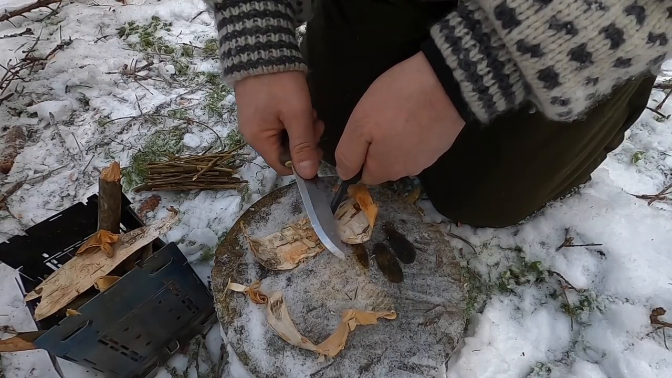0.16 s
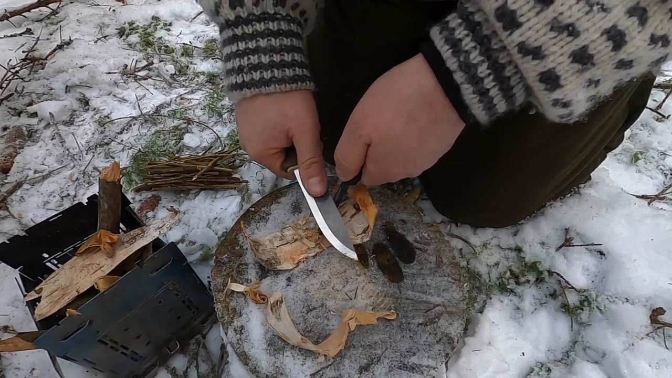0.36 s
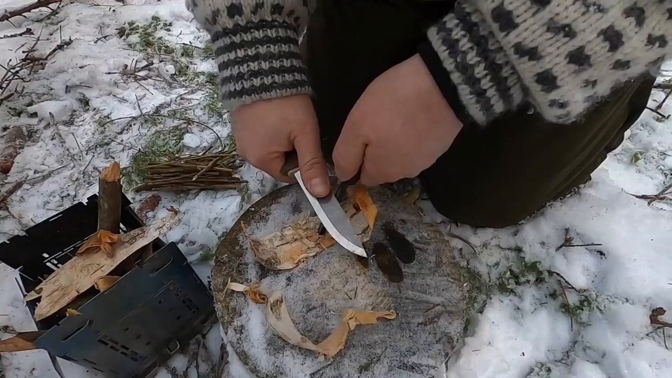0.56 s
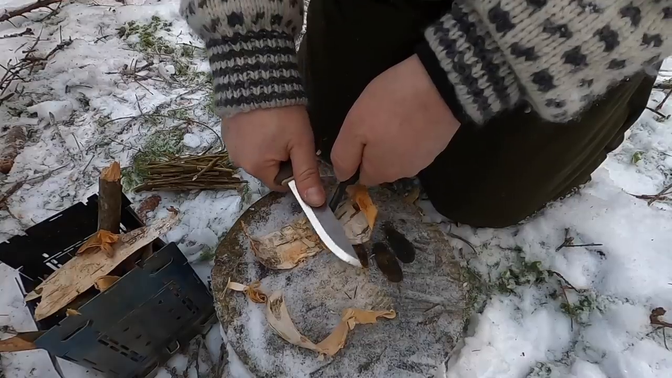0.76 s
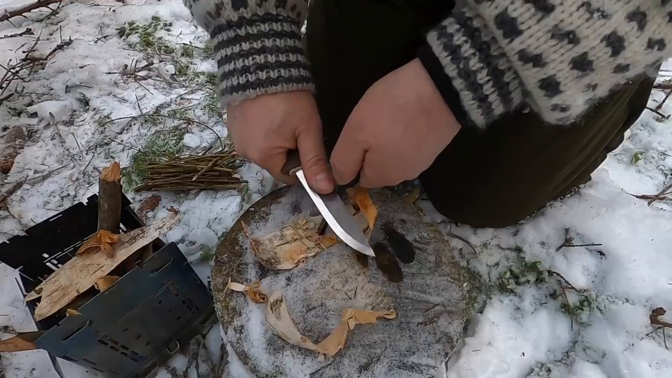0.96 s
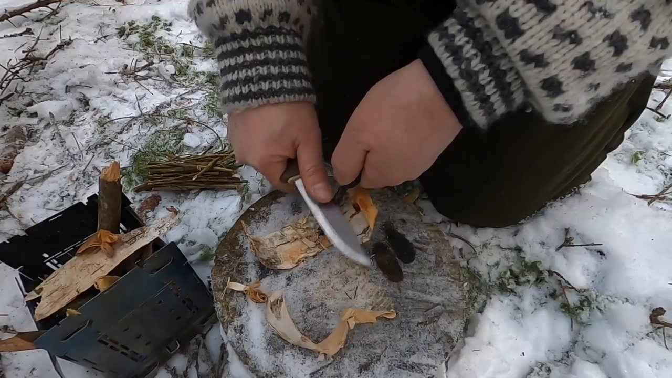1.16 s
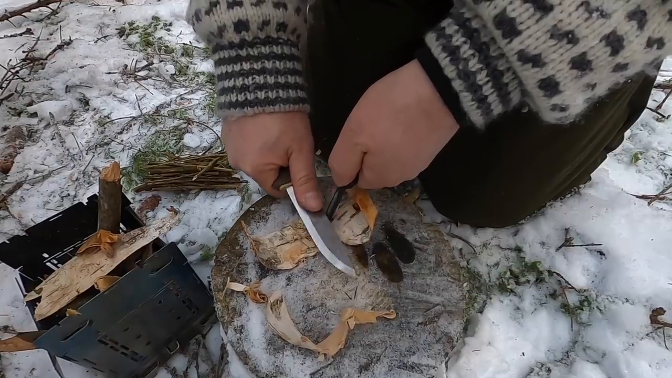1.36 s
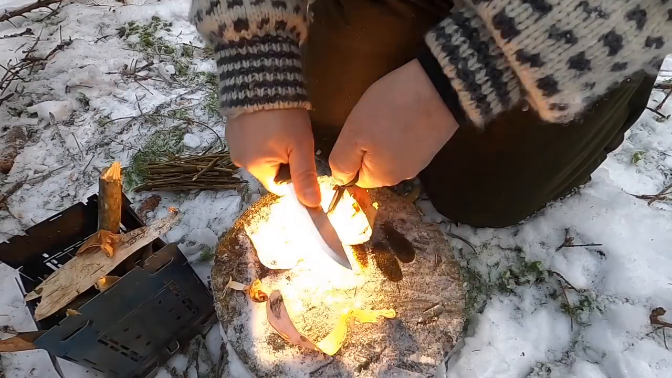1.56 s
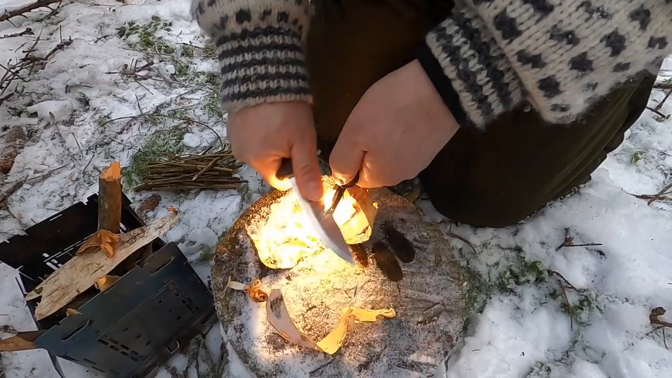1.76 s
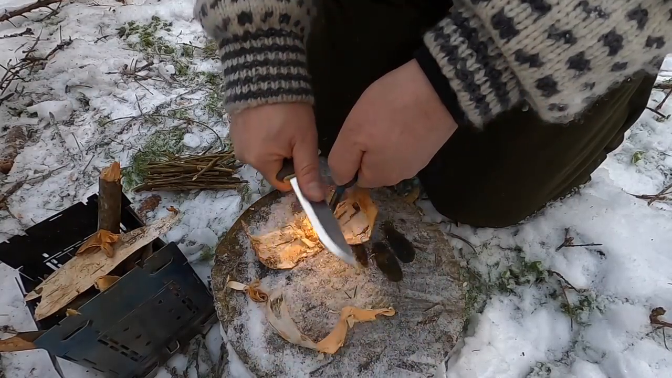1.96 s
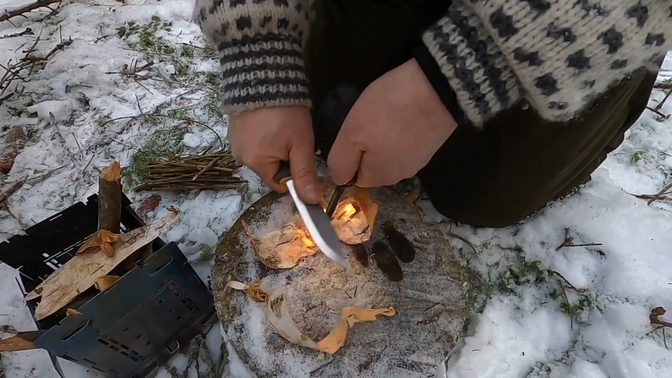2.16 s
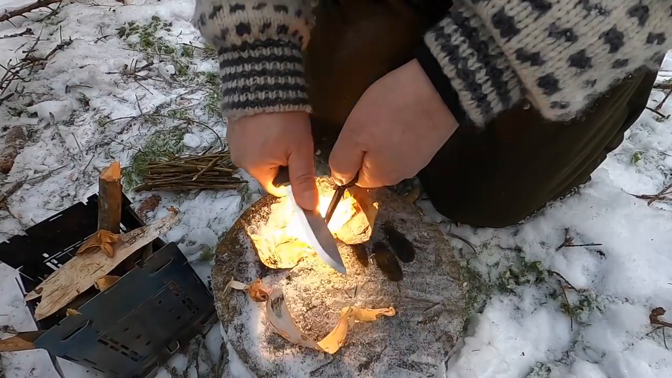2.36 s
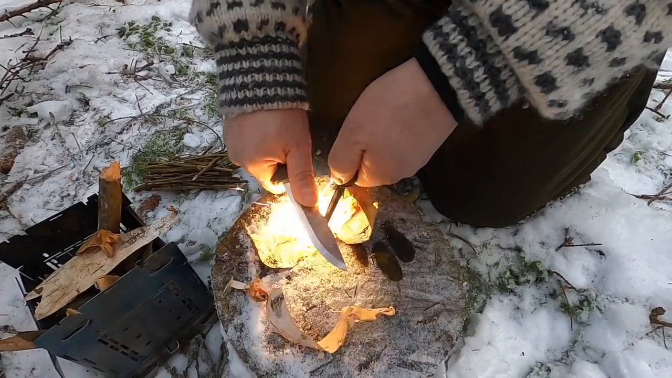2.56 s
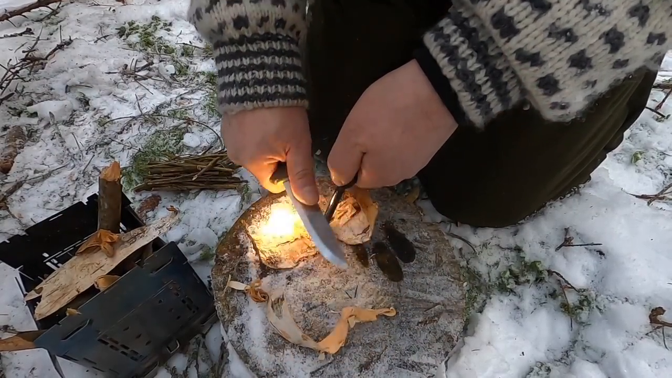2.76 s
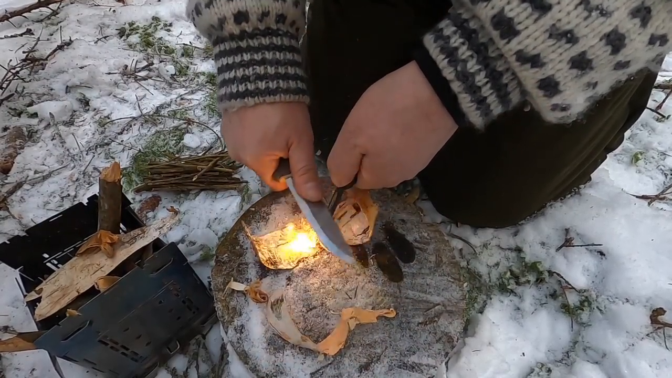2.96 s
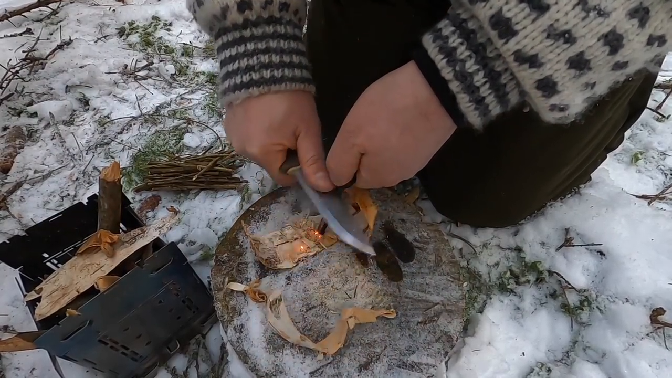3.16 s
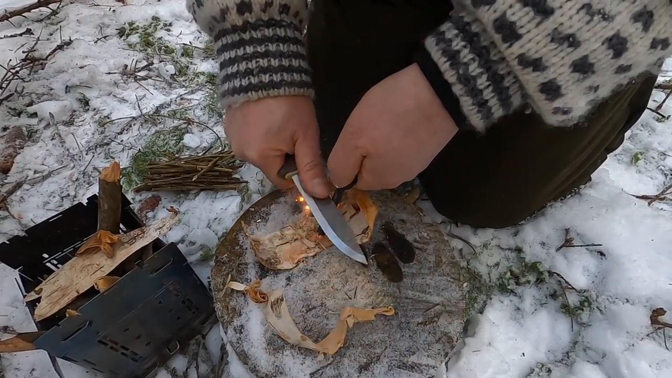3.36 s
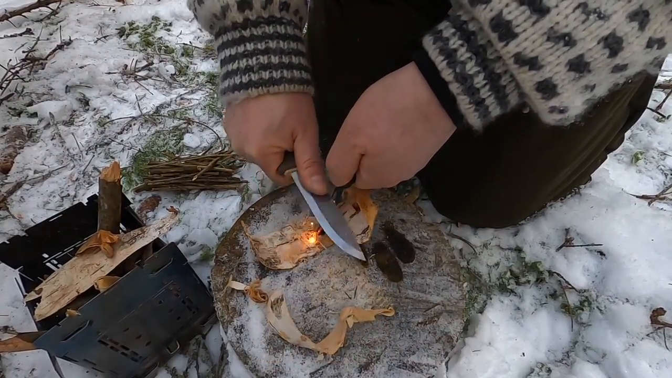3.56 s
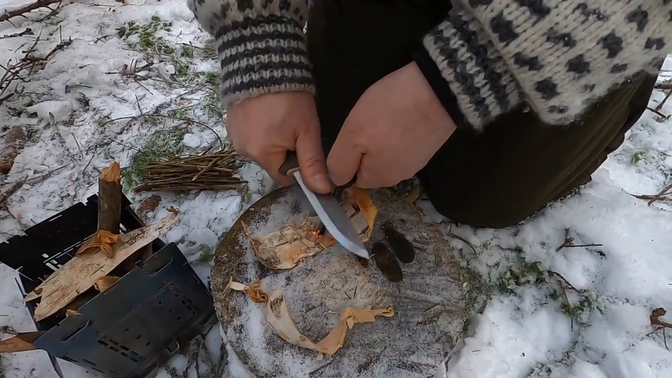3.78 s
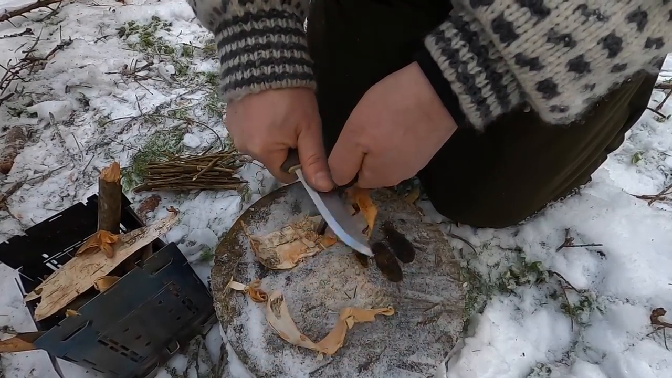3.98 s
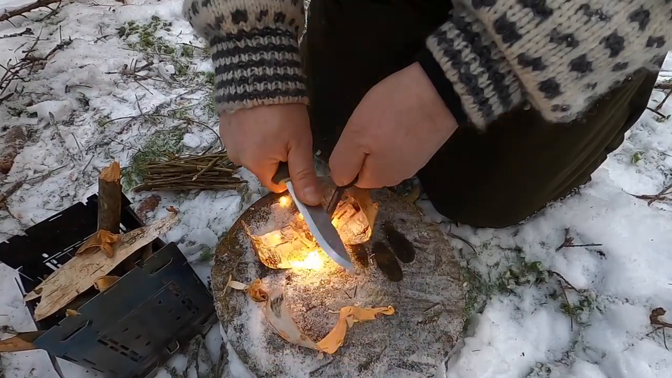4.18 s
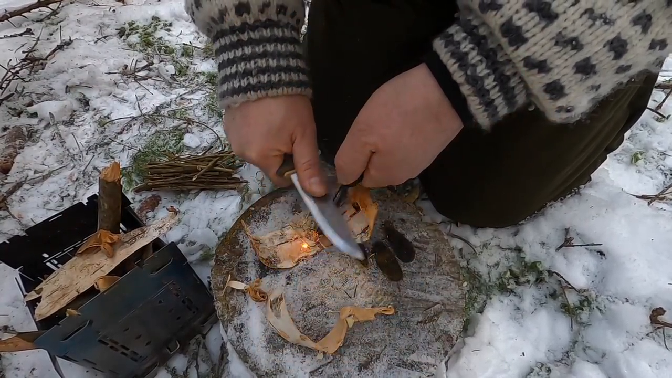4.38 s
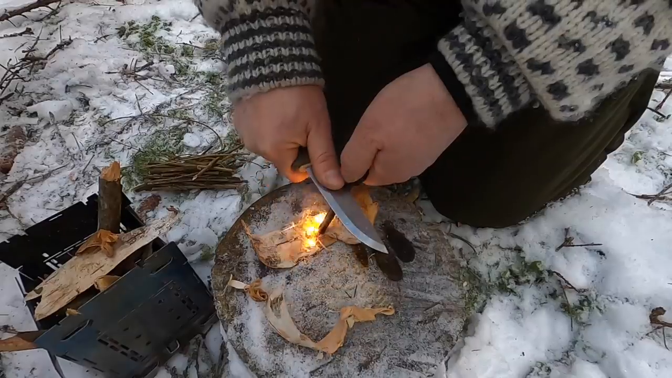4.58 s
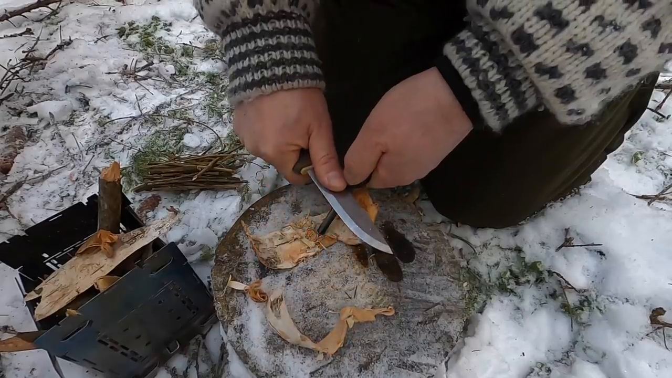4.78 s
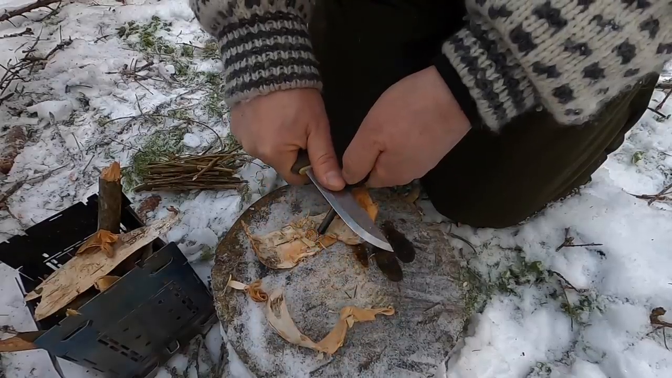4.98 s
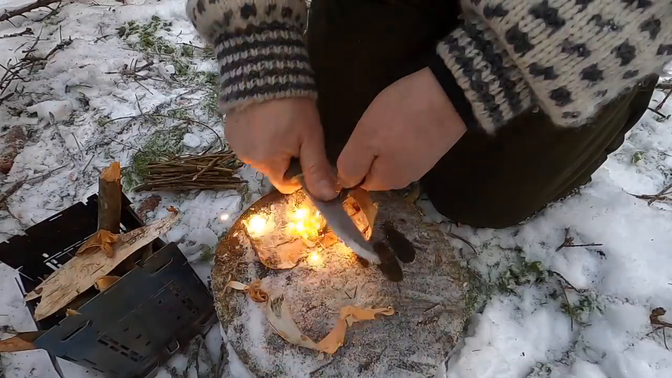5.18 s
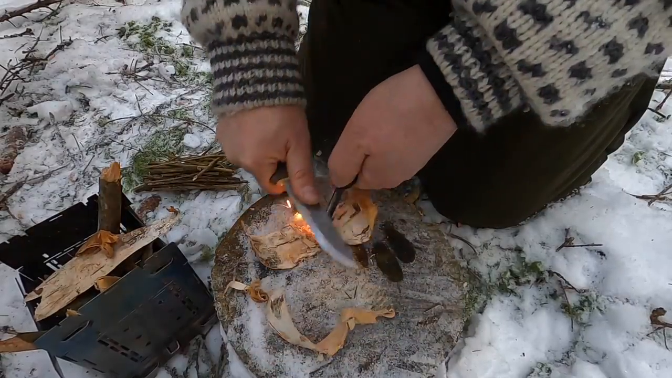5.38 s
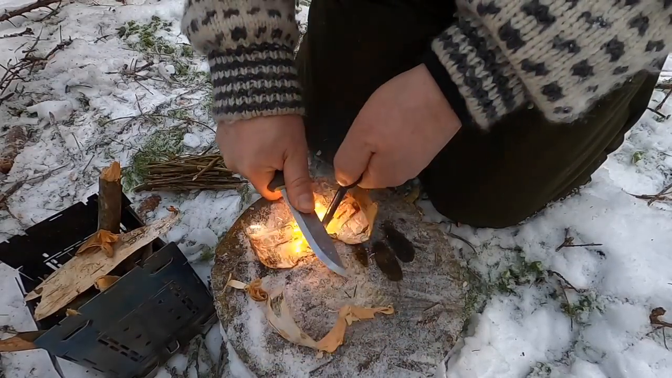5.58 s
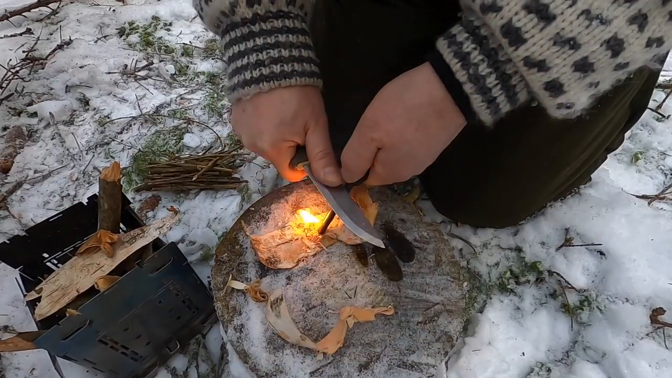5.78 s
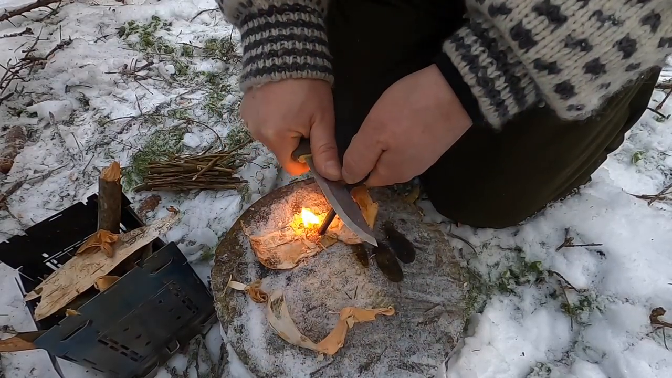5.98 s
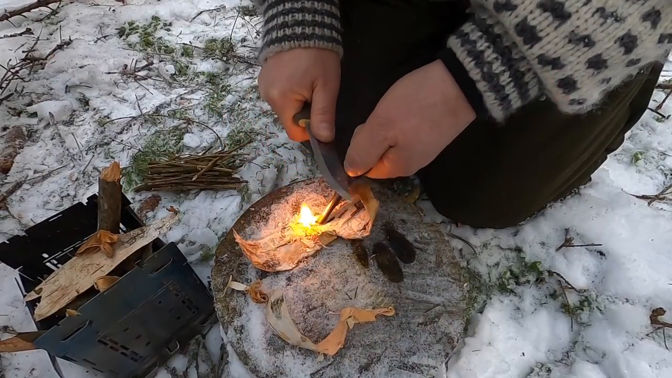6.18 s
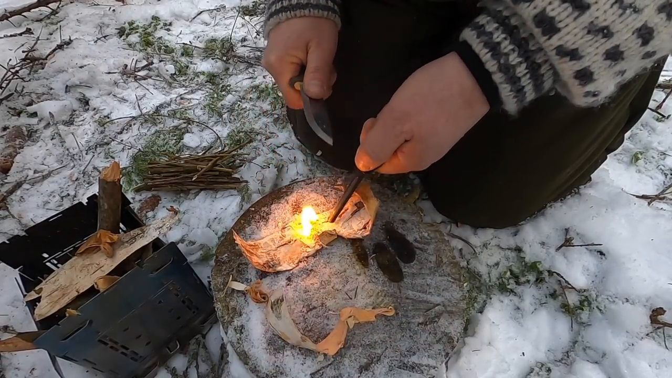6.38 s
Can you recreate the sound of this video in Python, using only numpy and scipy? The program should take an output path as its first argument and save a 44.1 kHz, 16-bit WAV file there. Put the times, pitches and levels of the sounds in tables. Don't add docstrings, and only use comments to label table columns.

```python
import sys
import numpy as np
from scipy import signal
from scipy.fft import rfft, irfft
from scipy.io import wavfile
from scipy.ndimage import uniform_filter1d, map_coordinates

SR = 44100
rng = np.random.default_rng(int(sys.argv[2]) if len(sys.argv) > 2 else 0)


def persist_wave(psi):
    counts = np.round(np.clip(psi, -1, 1) * 32767).astype(np.int16)
    wavfile.write(sys.argv[1], SR, np.atleast_2d(counts).T)


def decibels_to_gain(level_db):
    exponent = np.asarray(level_db, float) / 20
    return 10 ** exponent


N = 283694
TIME = np.arange(N) / SR

# (frequency [Hz], density [dB per Hz])
BITE = [(24, -67.5), (40, -43), (210, -17), (372, -5.5), (581, -3.5), (1110, 0), (1450, -3), (1730, 0),
        (2840, -3), (4540, -2), (5820, -11), (6750, -7.5), (8230, -29), (11400, -33), (14900, -59)]
# (frequency [Hz], width [Hz], gain [dB])
BITE_MODES = [(390, 60, -9), (1066, 190, 6), (1727, 100, -6.5), (2526, 59, 12), (4000, 330, 1.5),
              (6470, 370, 6), (9430, 930, 7.5)]


def unit(x):
    return x / np.sqrt(np.mean(x ** 2) + 1e-20)


def along(points, hz):
    f, v = np.transpose(points)
    return np.interp(np.log(hz + 1), np.log(f + 1), v)


def wobble(rate):
    return map_coordinates(rng.standard_normal(int(N * rate / SR) + 4), [TIME * rate])


def filtered(x, db_of_hz, size=4096):
    gain = decibels_to_gain(db_of_hz(np.fft.rfftfreq(size, 1 / SR)))
    ceps = irfft(np.log(np.maximum(gain, 1e-6)), size)
    ceps[1:size // 2] *= 2
    ceps[size // 2 + 1:] = 0
    return signal.oaconvolve(x, irfft(np.exp(rfft(ceps)), size))[:N]


def body(spectrum, modes, shift=1, lo_hz=1, hi_hz=1e5):
    def gain(hz):
        bumps = sum(db / (1 + (2 * (hz - c * shift) / w) ** 2) for c, w, db in modes)
        band = (1 + (lo_hz / (hz + 1)) ** 12) * (1 + (hz / hi_hz) ** 12)
        return along(spectrum, hz) + bumps - 10 * np.log10(band)
    return gain


def patchy(x, depth_db, size=128):
    z = signal.stft(x, nperseg=size)[2]
    field = uniform_filter1d(rng.standard_normal(z.shape), 3, 0)
    field = uniform_filter1d(field, 5, 1)
    return unit(signal.istft(z * decibels_to_gain(depth_db * unit(field)), nperseg=size)[1][:N])


def steady(x, span=0.024):
    return x / np.sqrt(np.abs(uniform_filter1d(x ** 2, int(span * SR))) + 1e-9)


def grit(per_s, spread_db, clump_db, smooth):
    hit = rng.random(N) < per_s / SR
    size = decibels_to_gain(spread_db * np.minimum(rng.exponential(size=N), 4)) * rng.choice([-1, 1], N)
    slips = unit(hit * size) + smooth * rng.standard_normal(N)
    return unit(slips * decibels_to_gain(clump_db * (wobble(70) + wobble(220))))


def sliding(x, spectrum, modes, travel, **band):
    turn = np.pi / 4 * (1 + np.tanh(wobble(29)))
    low = filtered(x * np.cos(turn), body(spectrum, modes, 1 - travel, **band))
    high = filtered(x * np.sin(turn), body(spectrum, modes, 1 + travel, **band))
    return unit(low + high)


def pings(hz, per_s, scatter, cycles, spread_db):
    at = np.flatnonzero((rng.random(N) < per_s / SR) & (hz > 0))
    draw = rng.standard_normal((len(at), 2))
    pitch = hz[at] * np.exp(scatter * draw[:, 0])
    step = np.arange(500)
    turns = pitch[:, None] * step / SR
    swell = (1 - np.exp(-turns)) * np.exp(-turns / cycles)
    rings = decibels_to_gain(spread_db * draw[:, 1:]) * np.sin(2 * np.pi * turns) * swell
    rings = rings * np.cos(np.pi / 2 * step / len(step))
    out = np.bincount((at[:, None] + step).ravel(), rings.ravel(), N + len(step))[:N]
    return out / np.sqrt(np.mean(out[hz > 0] ** 2))


def knocks(rows, crack, colour):
    out, t = np.zeros(N + SR), np.arange(SR // 25) / SR
    partials = [(.68, 0.26), (.84, 0.46), (1, 1), (1.12, 0.18), (2.3, 0.36)]
    for s, db, hz, t60 in rows:
        ring = sum(g * np.sin(2 * np.pi * hz * k * t) for k, g in partials)
        burst = (ring + crack * rng.standard_normal(len(t))) * (1 - np.exp(-t / 0.00023))
        out[round(s * SR):][:len(t)] += decibels_to_gain(db - 60 * t / t60) * burst
    return filtered(out[:N], lambda hz: along(colour, hz))


def strokes(tables, land=.012, lift=0.01048, fade_db=26):
    gain, rest = np.zeros(N), np.zeros((len(tables[0][0]) - 1, N))
    for rows in tables:
        s, db, *cols = np.transpose(rows)
        a = max(int((s[0] - land) * SR), 0)
        b = min(int((s[-1] + lift) * SR), N)
        t = TIME[a:b]
        off = np.clip(np.maximum((s[0] - t) / land, (t - s[-1]) / lift), 0, 1)
        level = decibels_to_gain(np.interp(t, s, db) - fade_db * off)
        louder = np.flatnonzero(level > gain[a:b])
        gain[a + louder] = level[louder]
        progress = (s - s[0]) / (s[-1] - s[0])
        for row, c in enumerate([progress, *cols]):
            rest[row, a + louder] = np.interp(t[louder], s, c)
    return gain, rest


def pressure(p, peak_db, peak_at, rise_db, fall_db, power):
    at = np.clip(peak_at, .05, .95)
    rise = rise_db * np.clip(1 - p / at, 0, 1) ** power
    fall = fall_db * np.clip((p - at) / (1 - at), 0, 1) ** power
    return peak_db - rise - fall


def far_hush():
    # (time [s], level [dB])
    swell = [(0, -51), (.7, -54), (1.2, -50.5), (4.6, -52), (5.1, -58), (5.5, -42.5), (6, -58.5),
             (6.43, -53.5)]
    # (frequency [Hz], density [dB per Hz])
    colour = [(20, -21), (60, -15), (250, -1.5), (450, -6), (1700, -0.5), (4000, -13.5), (8000, -29),
              (12000, -36.5), (14000, -42)]
    s, db = np.transpose(swell)
    far = patchy(filtered(rng.standard_normal(N), body(colour, [])), 2.4, size=512)
    return decibels_to_gain(np.interp(TIME, s, db) + 0.25 * wobble(14)) * far


def air_moan():
    # (time [s], level [dB], pitch [Hz])
    breath = [(.13, -85.5, 310), (.2, -62, 301), (.33, -49, 323), (.44, -49, 333.5), (.58, -58, 356),
              (.72, -68, 323)]
    gain, (_, hz) = strokes([breath])
    phase = 2 * np.pi * np.cumsum(hz * (1 + 0.0484 * wobble(18))) / SR
    return gain * unit(wobble(115)) * np.sqrt(2) * np.sin(phase)


def curling_bark():
    # (time [s], peak level [dB])
    rustles = [(6.127, -56), (6.192, -44), (6.323, -48.5), (6.42, -55)]
    rise_s, fall_s, drop_db = 0.033, 0.034, 11.5
    swells = [[(s - rise_s, db - drop_db), (s, db), (s + fall_s, db - drop_db)] for s, db in rustles]
    gain, _ = strokes(swells)
    crinkle = grit(per_s=2500, spread_db=1.5, clump_db=1.5, smooth=1.3)
    colour = [(500, -16.0), (3600, -4), (9000, -28), (14000, -68.5)]  # (Hz, dB per Hz)
    return gain * patchy(filtered(crinkle, body(colour, [(3860, 900, 7.6)])), 2.5)


def trunks(x, t60=0.2):
    t = np.arange(SR // 2) / SR
    tail = rng.standard_normal(len(t)) * decibels_to_gain(-60 * t / t60)
    wet = signal.oaconvolve(x, tail / np.linalg.norm(tail))[:N]
    return filtered(wet, lambda hz: along([(300, -1), (2500, -37.0), (9000, -23.5)], hz))


def shudder():
    # (frequency [Hz], density [dB per Hz])
    handling = [(20, -11), (45, 0), (90, 0.5), (150, -28), (400, -120)]
    gain, _ = strokes(down_strokes())
    lean = uniform_filter1d(gain, int(.06 * SR))
    lumps = unit(filtered(rng.standard_normal(N), body(handling, []), size=16384))
    return (decibels_to_gain(-78.5) + decibels_to_gain(-45.5) * lean) * decibels_to_gain(5.3 * wobble(7)) * lumps


def bark_ticks():
    # (time [s], peak level [dB], decay by 60 dB [s])
    taps = [(0.0, -7, 0.0092), (0.483, -44, 0.015), (0.566, -28, 0.024), (3.517, -8.5, 0.0044),
            (4.349, -11, 0.035), (4.42, -17, 0.0092), (4.705, -7.5, 0.022), (4.772, -17.5, 0.015),
            (4.815, -35, 0.014), (5.873, -7.5, 0.028), (5.892, -27, 0.033)]
    # (frequency [Hz], gain [dB])
    colour = [(100, -28), (800, -5.5), (4500, -6.5), (7500, -24), (10000, -23), (13000, -38.5),
              (16000, -39)]
    return decibels_to_gain(-16) * knocks([(s, db, 1200, t60) for s, db, t60 in taps], crack=4.1, colour=colour)


def slide():
    # (time [s], level [dB])
    touches = [
        [(.005, -41.5), (.035, -40), (.075, -30), (.11, -40.5), (.155, -39)],
        [(.41, -45), (.45, -44), (.475, -36), (.55, -34.5)],
    ]
    # (frequency [Hz], density [dB per Hz])
    colour = [(290, -55), (500, -27), (763, -24), (1210, -10.5), (1640, 0), (2040, -5.5), (2600, 1.5),
              (4190, -22), (6400, -27), (7140, -36), (13000, -75)]
    modes = [(1700, 120, 3.5), (2500, 130, 2.6), (6400, 330, 7.3)]  # (Hz, width Hz, dB)
    gain, _ = strokes(touches)
    slips = grit(per_s=4600, spread_db=2.5, clump_db=1.5, smooth=1.1)
    return gain * patchy(sliding(slips, colour, modes, 0.015), 0.84)


def ridge_catches():
    # (time [s], peak level [dB], ring [Hz])
    snags = [(0.362, 1.5, 2810), (1.047, -9, 2330), (1.6058, -16.5, 2600), (1.9744, -2, 2575),
             (2.174, -9, 2620), (2.3065, -4, 4820), (2.35, -2, 3900), (2.3564, 0.5, 3110),
             (2.5406, -4, 3430), (2.6232, -5, 2480), (2.7267, -5, 2660), (3.254, -2.5, 2750),
             (3.286, -13.5, 2520), (3.295, -4, 1700), (3.3395, -2, 2600), (3.6362, -4, 3800),
             (3.82, -3.5, 3930), (4.0382, 1.5, 3800), (4.0623, 0, 4300), (4.0688, 4, 2500),
             (4.22, -14, 3500), (4.248, -12.5, 4260), (4.366, -6, 2550), (4.599, -9.5, 3730),
             (4.667, -6, 1800), (5.1758, -11.5, 3180), (5.1926, -1.5, 1690), (5.257, -4.5, 3770),
             (5.5383, -2, 2530), (6.1533, -24.5, 1700)]
    # (frequency [Hz], gain [dB])
    colour = [(100, -18), (800, 0), (3000, 2), (5000, 2), (7500, -16), (12000, -44), (16000, -70)]
    return decibels_to_gain(-7) * knocks([(*row, .011) for row in snags], crack=0.19, colour=colour)


def up_strokes():
    # (start [s], length [s], peak level [dB], peak position [0-1 of the stroke], first ring [Hz])
    pulls = [(1.016, 0.059, -21, 0.54, 2520), (1.27, 0.059, -19.5, 0.69, 2750),
             (1.509, 0.074, -22, 0.68, 2740), (1.763, 0.062, -16.5, 0.73, 2697),
             (1.974, 0.053, -17, 0.58, 2560), (2.162, 0.061, -18.5, 0.77, 3000),
             (2.344, 0.061, -17.5, 0.65, 4000), (2.529, 0.066, -16.5, 0.81, 4350),
             (2.716, 0.049, -17.5, 0.8, 4680), (2.896, 0.045, -20.5, 0.07, 3440),
             (3.074, .044, -21.5, 0.13, 3700), (3.239, 0.062, -14.5, 0.82, 4460),
             (3.435, .063, -24, 0.2, 3470), (3.628, 0.0616, -18.5, 0.45, 4460),
             (3.817, 0.067, -17.5, 0.79, 4430), (4.015, 0.058, -15.5, 0.74, 4500),
             (4.302, 0.1, -27, 0.7, 2950), (4.419, 0.019, -49, .3, 2600), (4.576, 0.1, -19, 0.84, 4280),
             (5.25, 0.089, -19.5, 0.71, 3260), (5.484, 0.077, -17.5, 0.75, 4000),
             (5.728, 0.093, -19.5, 0.59, 3640)]
    rest_hz, sink = 2400, 1.67
    end_sag_hz = 120
    p = np.linspace(0, 1, 25)
    snag_db_per_khz, snag_at, snag_width = 2.5, 0.15, 0.14
    snag = snag_db_per_khz * np.exp(-((p - snag_at) / snag_width) ** 2)
    tables = []
    for s, length, db, at, hz in pulls:
        above_hz = hz - rest_hz
        lean_db = pressure(p, db, at, rise_db=10.5, fall_db=9, power=1.02)
        ring_hz = rest_hz + above_hz * (1 - p) ** sink - end_sag_hz * p ** 1.9
        tables.append(np.transpose([s + length * p, lean_db + above_hz / 1000 * snag, ring_hz, db + 0 * p]))
    return tables


def pull():
    # (frequency [Hz], density [dB per Hz])
    colour = [(60, -47.5), (320, -22.5), (760, -21), (1350, -21), (1900, -12), (2600, -3), (4300, -10.5),
              (6600, -20), (7400, -23), (11000, -41), (14000, -65.5), (15500, -75)]
    # (frequency [Hz], width [Hz], gain [dB])
    modes = [(403, 400, -6.5), (1030, 340, 13.5), (1719, 172, 12.5), (3900, 260, 3.5), (6300, 190, 7.5),
             (8150, 1700, -14)]
    blade_hz, clearer_db_per_khz = 2515, 3
    dull_hz, dulling = 5000, 0.38
    gain, (_, ring_hz, peak_db) = strokes(up_strokes())
    slips = grit(per_s=3200, spread_db=4.5, clump_db=-1.44, smooth=0.6)
    skate = patchy(sliding(slips, colour, modes, 0.02), 2.4)
    treble = filtered(skate, body([(1, 0.0031)], [], lo_hz=dull_hz))
    skate = filtered(skate, body([(1, 0.0098)], [], hi_hz=dull_hz))
    skate = skate + (gain / decibels_to_gain(peak_db)) ** dulling * treble
    ring = pings(ring_hz, per_s=800, scatter=.11, cycles=5.5, spread_db=4.5)
    ring = decibels_to_gain(-0.5 + clearer_db_per_khz * (ring_hz - blade_hz) / 1000) * ring
    tuned = np.exp(-((ring_hz - blade_hz) / 250) ** 2)
    note = pings(blade_hz * (gain > 0), per_s=300, scatter=0.012, cycles=30, spread_db=4)
    judder = decibels_to_gain(2 * wobble(110))
    return gain * steady(judder * (skate + ring) + decibels_to_gain(1) * tuned * note)


def down_strokes():
    # (start [s], length [s], peak level [dB], peak position [0-1 of the stroke],
    # weight on the stump [dB])
    pushes = [(0.815, 0.0992, -28.5, 0.32, -1), (1.113, 0.1195, -26.5, 0.52, -0.5),
              (1.344, 0.13, -24.5, 0.36, -2), (1.602, 0.03, -25.5, 0.6, -8.5), (1.64, 0.12, -22, 0.23, 4),
              (1.856, 0.077, -21, 0.7, -1.5), (1.94, 0.017, -40.5, 0.2, 4), (2.059, 0.12, -22.5, 0.4, 1),
              (2.253, 0.088, -24, 0.46, 0), (2.432, 0.094, -21.5, 0.6, -2), (2.621, 0.085, -22, 0.59, 1),
              (2.799, 0.075, -23.5, 0.62, -1.5), (2.969, .084, -25.5, 0.65, -2.5),
              (3.155, 0.077, -23, 0.43, 0.5), (3.327, 0.1, -23.5, 0.45, 0), (3.526, .084, -24.5, 0.7, 0),
              (3.722, 0.072, -21.5, .65, -3), (3.916, 0.079, -20, 0.4, -3.5), (4.099, .155, -25.5, 0.26, 3),
              (4.251, 0.052, -43, .4, 7.5), (4.49, 0.1, -26, 0.47, 2), (5.145, 0.1, -23.5, 0.64, 4.5),
              (5.371, 0.09, -20, 0.66, -1.5), (5.606, 0.11, -22.5, 0.59, -0.5)]
    firm_db, rod_free, spark_free = -21.5, 0.45, 0.35
    p = np.linspace(0, 1, 25)
    stump_db = -12 + 11.5 * p
    rod_db = -18.5 + 10.5 * np.exp(-((p - .33) / 0.29) ** 2)
    spark_db = -19 - 12 * np.exp(-p / 0.22)
    tables = []
    for s, length, db, at, weight_db in pushes:
        lean_db = pressure(p, db, at, rise_db=10, fall_db=14.5, power=1.85)
        light_db = min(firm_db - db, 6)
        tables.append(np.transpose([s + length * p, lean_db, weight_db + stump_db, rod_db + rod_free * light_db,
                                    spark_db + spark_free * light_db, db + 0 * p]))
    return tables


def rasp_and_ring(slips, progress, touching):
    rasp = decibels_to_gain(3.3) * patchy(sliding(slips, BITE, BITE_MODES, 0.013, lo_hz=1490, hi_hz=5430), 3.9)
    climb_hz = (2500 + 2300 * np.tanh(2.0 * progress)) * touching
    ring = decibels_to_gain(-4) * pings(climb_hz, per_s=470, scatter=0.078, cycles=4.6, spread_db=-0.5)
    return steady(rasp + ring)


def stump_shake(slips, stump_db):
    jolts = grit(per_s=1500, spread_db=5.5, clump_db=5.0, smooth=0.46) + 0.6 * slips
    stump = decibels_to_gain(stump_db + 0.52) * steady(sliding(jolts, BITE, BITE_MODES, 0.091, hi_hz=1430))
    thud = unit(filtered(jolts, body(BITE, [], lo_hz=80, hi_hz=334)))
    return stump + decibels_to_gain(1.2 * stump_db - 20 + 3.7 * wobble(10)) * thud


def rod_song(slips, rod_db):
    return decibels_to_gain(rod_db + 3.5) * patchy(sliding(slips, BITE, BITE_MODES, 0.0067, lo_hz=5940, hi_hz=6960), 0.65)


def spark_sizzle(slips, spark_db):
    sizzle = grit(per_s=660, spread_db=3, clump_db=1.5, smooth=1.3)
    sparks = filtered(sizzle + 1.3 * slips, body(BITE, BITE_MODES, lo_hz=7990))
    return decibels_to_gain(spark_db + 6.5) * patchy(sparks, 0.84)


def push():
    gain, (progress, stump_db, rod_db, spark_db, peak_db) = strokes(down_strokes())
    slips = grit(per_s=3500, spread_db=3.0, clump_db=1.68, smooth=0.38)
    scrape = rasp_and_ring(slips, progress, gain > 0) + stump_shake(slips, stump_db)
    treble = rod_song(slips, rod_db) + spark_sizzle(slips, spark_db)
    dulled = (gain / decibels_to_gain(peak_db)) ** 0.29
    return gain * (scrape + dulled * treble)


def scene():
    near = push() + pull() + slide() + ridge_catches() + bark_ticks()
    woods = far_hush() + air_moan() + curling_bark()
    mono = near + trunks(near) + woods + shudder()
    return np.array([mono, mono])


def low_pass(x):
    return signal.sosfilt(signal.butter(12, 15060, fs=SR, output="sos"), x)


def record(dry):
    # (frequency [Hz], level [dB])
    apart = [(100, -24), (400, -27), (1000, -34), (3000, -31.5), (6000, -17.5), (10000, -14.5), (13000, 7)]
    hz, _, z = signal.stft(dry[0], SR, nperseg=1024)
    blocks = uniform_filter1d(rng.standard_normal(z.shape), 150, 0)
    blocks = uniform_filter1d(blocks, 3, 1)
    parted = (unit(blocks) > .7) | (hz[:, None] > 11300) | (hz[:, None] < 500)
    turned = np.exp(2j * np.pi * rng.random(z.shape))
    trace = z * parted * decibels_to_gain(along(apart, hz))[:, None] * turned
    side = signal.istft(trace, SR, nperseg=1024)[1][:N]
    top = .95
    held = dry / (1 + np.abs(dry / top) ** 4) ** (1 / 4)
    return low_pass(held + np.array([side, -side]))


dry = scene()
out = record(dry)
persist_wave(out)
```